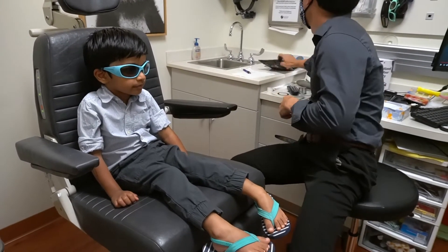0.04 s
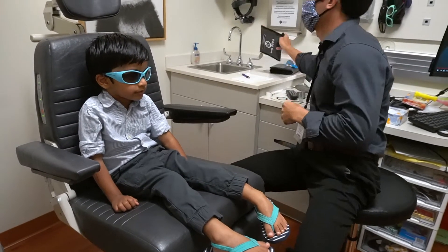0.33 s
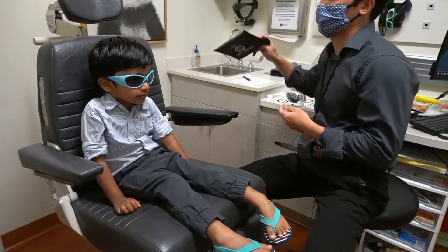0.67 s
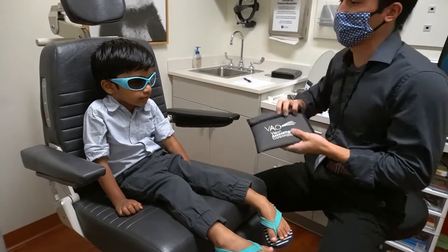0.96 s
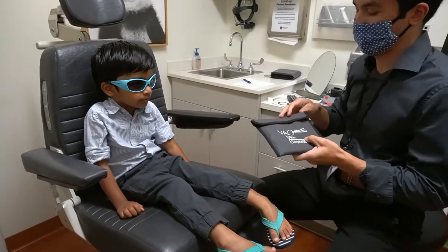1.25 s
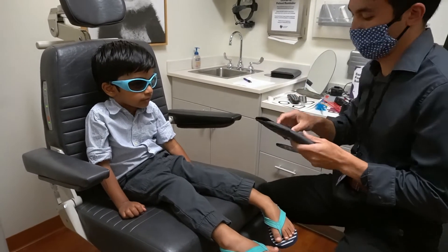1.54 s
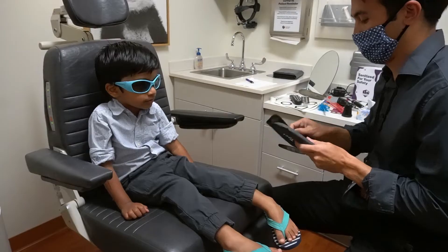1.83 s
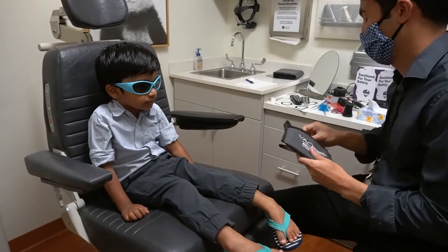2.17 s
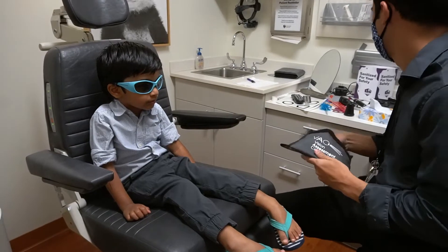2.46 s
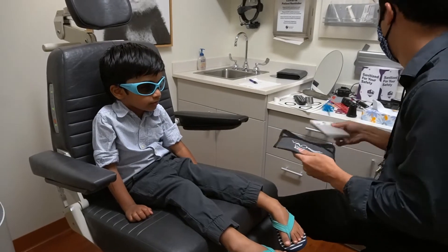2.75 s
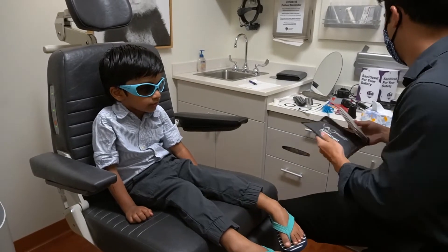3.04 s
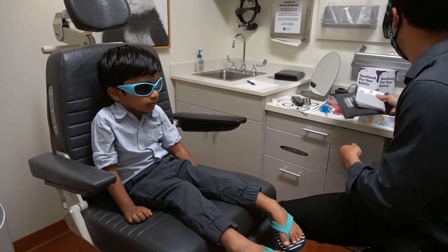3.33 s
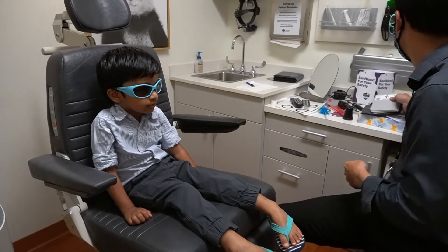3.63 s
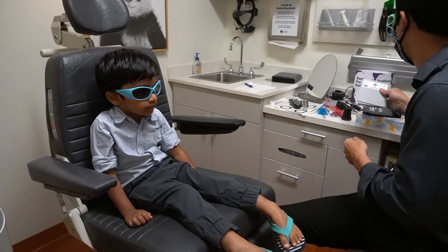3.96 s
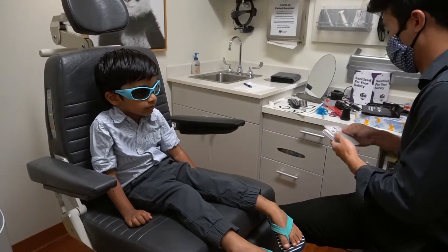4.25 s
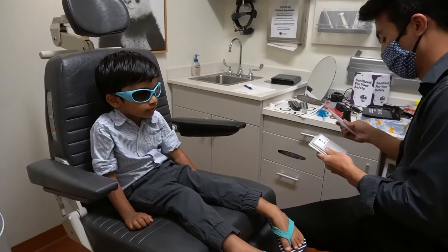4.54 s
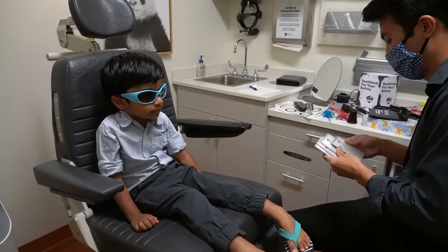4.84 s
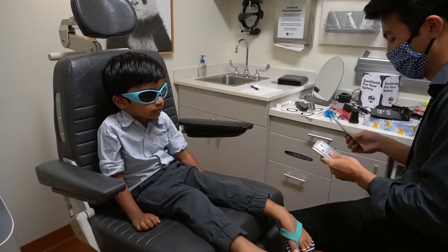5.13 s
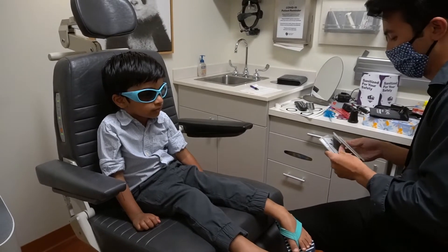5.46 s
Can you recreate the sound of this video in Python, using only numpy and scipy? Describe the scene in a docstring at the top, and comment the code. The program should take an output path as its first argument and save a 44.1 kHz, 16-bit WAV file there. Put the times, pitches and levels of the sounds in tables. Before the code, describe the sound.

A vinyl pouch is picked up and unzipped, then stiff cards slide out and click in a small humming room.

```python
"""Ventilation hums in a small room whose hard walls give a short, bright ring.
A vinyl pouch rubs and knocks as it is lifted off a countertop; the cabinet below booms.
A stool rolls while the pouch changes hands, its metal pull jingling, and is turned over.
The zipper runs, stiff cards rasp out and the pouch is laid down.
Last, the cards squeak faintly, click and snap as they are sorted."""
import sys
import numpy as np
from scipy import signal
from scipy.fft import rfft, irfft
from scipy.io import wavfile
from scipy.ndimage import uniform_filter1d

SR = 44100
rng = np.random.default_rng(int(sys.argv[2]) if len(sys.argv) > 2 else 0)


def digitize_waveform(pressure):
    """Quantize a signal to 16-bit integers and store it at the path in sys.argv[1].

    Rows of a 2-D input are taken as channels; values are limited to [-1, 1].
    """
    field = np.atleast_2d(pressure).T
    bounded = np.clip(field, -1, 1)
    quanta = np.round(bounded * 32767).astype(np.int16)
    wavfile.write(sys.argv[1], SR, quanta)


N = 246678
TIME = np.arange(N) / SR
FREQ = np.maximum(np.arange(N // 2 + 1) * SR / N, 1e-3)


def undb(db):
    """Decibels to gain."""
    return 10 ** (np.asarray(db) / 20)


def unit(x):
    """Scale to rms 1."""
    return x / np.sqrt(np.mean(x ** 2) + 1e-30)


def blow(x):
    """Scale to the energy of 2.5 ms at full level."""
    return x * np.sqrt(.0025 * SR / (np.sum(x ** 2) + 1e-30))


def add(track, start_s, x):
    """Mix a short sound into a track."""
    i = int(start_s * SR)
    track[i:i + len(x)] += x[:N - i]


def on_log(points, hz):
    """Interpolate (frequency [Hz], value) points over log frequency."""
    point_hz, value = np.transpose(points)
    return np.interp(np.log(hz), np.log(point_hz), value)


def follow(curve):
    """A curve's columns per sample, then a gate open while it lasts."""
    times_s, *columns = np.transpose(curve)
    gate = (TIME > times_s[0]) & (TIME < times_s[-1])
    return [np.interp(TIME, times_s, column) for column in columns] + [gate]


def walk(rate_hz):
    """Smooth random wavering, rms near 1."""
    hold = int(SR / rate_hz)
    steps = np.repeat(rng.standard_normal(N // hold + 1), hold)
    return unit(uniform_filter1d(uniform_filter1d(steps, hold), hold))[:N]


def uneven(spread_db, max_sigma=2):
    """Random gain per sample, clipped log-normal."""
    return undb(spread_db * np.clip(rng.standard_normal(N), -2, max_sigma))


def stroke(peak_s, length_s, rise_share=0.48, shape=1.48):
    """Swell and fade of a hand movement; shape 1 is pointed, 2 round."""
    side_s = length_s * np.where(TIME < peak_s, rise_share, 1 - rise_share)
    return np.exp(-np.minimum(np.abs((TIME - peak_s) / side_s) ** shape, 20))


def resonance(hz, width_hz):
    """Randomly driven resonance; its centre may move."""
    phase = 2 * np.pi * np.cumsum(hz * np.ones(N)) / SR
    return unit(walk(2 * width_hz) * np.cos(phase) + walk(2 * width_hz) * np.sin(phase))


def registers(colour):
    """A material's body, middle, treble and sheen spectra, each of unit power."""
    # crossovers (frequency [Hz])
    edges_hz = [700, 2500, 6500]
    below = [1 / (1 + (FREQ / edge) ** 8) for edge in edges_hz]
    shares = [below[0], (1 - below[0]) * below[1], (1 - below[1]) * below[2], 1 - below[2]]
    gain = undb(on_log(colour, FREQ)) / (1 + (130 / FREQ) ** 2)
    spectra = []
    for share in shares:
        cepstrum = irfft(np.log(unit(gain * np.sqrt(share)) + 1e-4), N)
        cepstrum[1:N // 2] *= 2  # fold to minimum phase
        cepstrum[N // 2 + 1:] = 0
        spectra.append(np.exp(rfft(cepstrum)))
    return spectra


def tilted(balance_db, db_per_octave):
    """Gains of the four registers, tilted about the middle one."""
    # per register (offset from the middle [octaves])
    offsets = [-2, 0, 2, 3]
    return undb(np.array(balance_db) + db_per_octave * np.array(offsets))


def strikes(events, modes, grit, grit_s, detune=.01):
    """Blows ring an object's modes; the contact point favours those near one centre."""
    out, t = np.zeros(N), TIME[:SR // 2]
    for start_s, db, centre_hz, spread_octaves in events:
        ring = 0
        for hz, mode_db, t60_s in modes:
            weight = undb(mode_db) * np.exp(-.5 * (np.log2(hz / centre_hz) / spread_octaves) ** 2)
            pitch_hz = hz * (1 + detune * rng.standard_normal())  # the grip shifts each mode
            decay = np.exp(-np.log(1000) * t / t60_s)
            ring = ring + rng.choice([-1, 1]) * weight * np.sin(2 * np.pi * pitch_hz * t) * decay
        force = grit * rng.standard_normal(len(t)) * np.exp(-t / grit_s)
        force[0] += 1
        add(out, start_s, undb(db) * blow(signal.fftconvolve(force, ring)))
    return out


def ventilation(air_db=-18, waver_db=3.0, drift_hz=2.71):
    """Duct rumble and hiss with wavering fan tones."""
    # duct noise (frequency [Hz], relative level [dB])
    air_colour = [(4, -5.5), (10, 1.5), (24, -2), (43, -14.5), (68, -14), (95, -31.5), (170, -31),
                  (270, -37.5), (400, -44), (700, -49), (1400, -54), (2200, -56.5), (4500, -62.5),
                  (16000, -74.5)]
    # fan tones (frequency [Hz], level [dB])
    fan_tones = [(118.4, -44.5), (242.2, -50), (888, -69)]
    air = unit(irfft(rfft(rng.standard_normal(N)) * undb(on_log(air_colour, FREQ)), N))
    fan = 0
    for hz, db in fan_tones:
        gain = undb(db + waver_db * walk(9))
        phase = 2 * np.pi * np.cumsum(hz + drift_hz * walk(14)) / SR
        fan = fan + gain * unit(np.sin(phase))
    return undb(air_db) * air + fan


def rubbing(slips_per_s=5000, slip_waver_db=1.9, crinkles_per_s=45, crinkle_db=-9):
    """Vinyl and cards catch and let go in tiny slips, with a few brighter crinkles."""
    # strokes (peak time [s], length [s], level [dB], tilt [dB/octave])
    rubs = [(0.043, 0.2, -36, 1.6), (0.223, 0.11, -28.5, -.4), (0.418, 0.14, -42.5, 0.5),
            (0.9, 0.3, -30.5, -0.3), (0.978, 0.042, -20, 2.5), (1.07, 0.12, -25, 1.5),
            (1.212, 0.082, -30, 0.1), (1.17, 0.71, -38.5, -4), (1.40, 0.091, -31, -5.5),
            (1.459, 0.063, -21, -1), (1.538, 0.11, -23.5, -4), (1.775, .13, -32, 2.5),
            (1.959, 0.056, -21, 0), (2.075, 0.15, -37.5, -0.3), (2.277, 0.19, -42.5, -.5),
            (2.427, 0.11, -35, .3), (2.635, 0.21, -35.5, -0.5), (2.705, 0.048, -23.5, 2),
            (2.768, 0.054, -30, 2), (3.144, 0.058, -35, -2.5), (3.214, .17, -40.5, -0.4),
            (3.68, 0.15, -34.5, 0.9), (3.769, 0.14, -39.5, -0.5), (4.297, 0.06, -45, -0.5),
            (4.413, 0.1, -52, 3), (4.505, .06, -48.5, 3.5), (4.89, .04, -33.5, 1.5), (5.34, 0.11, -52.5, 0)]
    # friction spectrum (frequency [Hz], relative level [dB])
    colour = [(100, 8), (350, 4), (750, -3.5), (1200, 2), (2200, -2), (4300, 0.5), (5300, -4.5),
              (7500, -7.5), (11000, -18.5), (16000, -33)]
    # body to sheen (gain [dB])
    balance_db = [-5, 0.5, -2.5, -11]
    power = np.zeros((4, N))
    for peak_s, length_s, db, tilt in rubs:
        gains = undb(db) * tilted(balance_db, tilt)
        power += gains[:, None] ** 2 * stroke(peak_s, length_s) ** 2
    slips = (rng.random(N) < slips_per_s / SR) * rng.standard_normal(N) * uneven(spread_db=0.5)
    slips = rfft(unit(slips * undb(slip_waver_db * walk(220))))
    crinkles = rfft(unit((rng.random(N) < crinkles_per_s / SR) * uneven(spread_db=3)))
    bands = zip(np.sqrt(power), tilted(crinkle_db, db_per_octave=1.26), registers(colour))
    return sum(swell * irfft((slips + crisp * crinkles) * band, N) for swell, crisp, band in bands)


def clicks(scrape=0.25, grain_db=4, clean_tick_ms=1.3):
    """Cards, vinyl and zipper make contact: a sharp tick, then dying chatter."""
    # contacts (time [s], level [dB], tilt [dB/octave], chatter decay [ms])
    contacts = [(.042, -26, 0.5, 0.96), (0.182, -25, -0.7, 2.6), (.230, -22.5, 1.2, 1.9),
                (0.388, -28, -1, 11), (.487, -41.5, 3.5, 10), (.654, -32, -1.5, 2.8), (.732, -17, 1.3, 5.5),
                (.779, -19, -1.5, 7), (.948, -9, 0, 5.5), (1.061, -15, -3, 6.2), (1.079, -32, 7.5, 11),
                (1.186, -16.5, 0, 3), (1.366, -26, -3.5, 2.4), (1.432, -16, -1.5, 7),
                (1.444, -11.5, -0.5, 9), (1.712, -29, 3, 2), (1.724, -15.5, 2.15, 5.5),
                (1.736, -17.5, 2.5, 2.3), (1.831, -24.5, 4.5, 3.3), (1.856, -16.5, 4, 5.4),
                (1.879, -10.5, 3, 5.2), (2.182, -40, 5.5, 3), (2.410, -27, 0.5, 10),
                (3.091, -27.5, -4.5, 2.7), (3.135, -28, -2.8, 2.6), (3.2336, -30.5, 2, 0.55),
                (3.383, -41.5, 0.5, 8), (3.611, -31, -4.5, 3), (4.526, -35, 0.5, 3.2), (4.851, -22, 0, 1.6),
                (4.863, -23.5, 0.9, 3), (4.933, -25.5, -2.5, 2), (4.9595, -18.5, 2.5, 0.77),
                (5.493, -24, 0.2, 0.56)]
    # contact spectrum (frequency [Hz], relative level [dB])
    colour = [(100, -13), (250, 3.5), (800, -2), (1400, 4.5), (2200, 2), (4200, -1.5), (5300, -6.5),
              (7500, -5), (11000, -15.5), (16000, -31)]
    # body to sheen (gain [dB])
    balance_db = [-7, 0.5, -1, -9]
    out, t = np.zeros(N), TIME[:4096]
    responses = [irfft(band, N)[:len(t)] for band in registers(colour)]
    for start_s, db, tilt, decay_ms in contacts:
        chatter = rng.standard_normal(len(t)) * undb(grain_db * rng.standard_normal(len(t)))
        roughness = scrape / (1 + (clean_tick_ms / decay_ms) ** 2)  # brief contacts hardly chatter
        force = roughness * chatter * np.exp(-t / (decay_ms / 1000))
        force[0] += 1
        for response, gain in zip(responses, tilted(balance_db, tilt)):
            add(out, start_s, undb(db) * gain * blow(signal.fftconvolve(force, response)))
    return out


def cabinet_boom():
    """The cabinet's low modes ring under the first knock."""
    # blow (time [s], level [dB], centre [Hz], spread [octaves])
    blows = [(.2335, -6.5, 70, 1.2)]
    # cabinet modes (frequency [Hz], relative level [dB], t60 [s])
    modes = [(48, -4, 0.25), (73, 1.5, 0.18), (121, 2, 0.15)]
    return strikes(blows, modes, grit=.01, grit_s=.005)


def knocks():
    """Dull blows ring the damped modes of countertop and pouch."""
    # knocks (time [s], level [dB], centre [Hz], spread [octaves])
    blows = [(0.2339, -3, 333, .32), (.241, -10.5, 1080, 0.59), (.263, -15, 340, 0.26),
             (1.522, -2, 1070, 0.53), (1.527, -10.5, 750, .7), (1.546, -6.5, 253, .17),
             (1.945, -23.5, 200, 1.1), (2.2099, -16.5, 523, 0.41), (2.4652, -18.5, 680, 0.68),
             (2.6017, -18.5, 610, 0.38), (3.092, -24, 1290, 0.45), (3.147, -22.5, 580, 0.34),
             (3.735, -19.5, 650, 0.74), (3.754, -20.5, 820, 0.49), (4.5255, -27.5, 420, .8),
             (5.490, -26.5, 760, 0.55)]
    # body modes (frequency [Hz], relative level [dB], t60 [s])
    modes = [(166, 6, 0.069), (247, 4, 0.082), (324, 2.5, 0.057), (371.4, 6, 0.043), (474, 1.5, 0.026),
             (542, 4, 0.021), (689, -0.5, 0.04), (720, 0.5, 0.019), (940, -0.5, 0.039), (1065, -2, 0.026),
             (1350, -15, 0.024), (1374, 2, 0.025), (1700, -6.5, 0.049), (2200, 3, 0.014), (2750, -1, .02)]
    return strikes(blows, modes, grit=0.077, grit_s=0.0029, detune=0.0056)


def stool(floor_hz=62, width_hz=36):
    """Rolling casters set the floor rumbling."""
    # roll (time [s], level [dB])
    roll = [(.9, -42), (1.05, -31), (1.18, -26.5), (1.29, -20), (1.41, -16), (1.5, -27.5), (1.6, -35),
            (1.7, -42)]
    db, rolling = follow(roll)
    return rolling * undb(db) * resonance(floor_hz, width_hz)


def pull_jingles():
    """The metal pull swings against its slider and rings."""
    # hits (time [s], level [dB], centre [Hz], spread [octaves])
    blows = [(.950, -23, 3500, 0.74), (.977, -10.5, 3750, 0.69), (.986, -18, 4200, 0.96),
             (1.079, -15.5, 5770, 0.42), (1.091, -16, 6460, 0.38), (1.115, -22, 6200, 0.83)]
    # pull modes (frequency [Hz], relative level [dB], t60 [s])
    modes = [(2886, 4.5, 0.09), (3250, -5, .04), (3800, -5, .24), (3797, 3.5, 0.15), (3930, -11, .1),
             (4440, 4, 0.03), (4500, 3, 0.047), (5550, -5, 0.21), (5620, -4, .16), (6000, 8, 0.02),
             (6310, 7, 0.038), (6680, 4, 0.028), (6800, 0, 0.043), (7100, 5, 0.036), (7120, 6, 0.035),
             (8040, 5, 0.044)]
    return strikes(blows, modes, grit=.08, grit_s=0.0039, detune=0.0012)


def zipper(jitter=.4, body_db=-11, sheen_db=-8, scrape=1.3, tooth_s=0.001):
    """The slider parts the teeth unevenly, each a tick and a scrape; the opening pouch sounds deeper."""
    # slider run (time [s], tooth rate [1/s], level [dB], treble gain [dB])
    run = [(1.82, 149, -49, 5), (1.833, 265, -19.5, 4), (1.85, 304, -28.5, 4.5), (1.88, 413, -30.5, 7),
           (1.915, 514, -17, 0.5), (1.945, 460, -20, -9), (1.965, 290, -19.5, -3.5), (1.989, 220, -45, -5)]
    # zipper spectrum (frequency [Hz], relative level [dB])
    colour = [(100, -36), (500, -6), (780, -1.5), (1300, 10), (2300, -1), (3900, 1.5), (5300, -2),
              (7500, -0.5), (11000, -9.5), (16000, -24)]
    teeth_per_s, db, treble_db, running = follow(run)
    teeth_passed = np.cumsum(teeth_per_s * np.exp(jitter * walk(300))) / SR
    ticks = np.diff(np.floor(teeth_passed), prepend=0)
    ticks *= uneven(spread_db=2.5, max_sigma=1) / np.sqrt(teeth_per_s)
    rasp = signal.lfilter([1], [1, -np.exp(-1 / (tooth_s * SR))], ticks) * rng.standard_normal(N)
    force = rfft(unit(unit(ticks) + scrape * unit(rasp)))
    bands = zip(registers(colour), (body_db, 0, treble_db, treble_db + sheen_db))
    return running * sum(undb(db + band_db) * irfft(force * band, N) for band, band_db in bands)


def card_drag(width_hz=280):
    """Sliding cards rasp in the pouch's hollow, which changes size."""
    # slide (time [s], resonance [Hz], level [dB])
    slide = [(2.12, 1240, -49), (2.31, 1228, -44.5), (2.46, 880, -36), (2.57, 850, -43), (2.62, 970, -39),
             (2.70, 1000, -31), (2.80, 900, -56)]
    hz, db, sliding = follow(slide)
    return sliding * undb(db) * resonance(hz, width_hz)


def card_squeaks(pitch_hz=1370, width_hz=130):
    """Some strokes on the cards sing faintly in one narrow band."""
    # squeaks (peak time [s], length [s], level [dB])
    squeaks = [(4.19, .07, -51), (4.31, .09, -56), (4.823, 0.055, -53), (4.891, .04, -33)]
    swell = sum(undb(db) * stroke(peak_s, length_s) for peak_s, length_s, db in squeaks)
    return swell * resonance(pitch_hz, width_hz)


def card_snaps():
    """A card edge snaps against the stack and rings briefly."""
    # snaps (time [s], level [dB], centre [Hz], spread [octaves])
    blows = [(4.851, -18, 3400, 0.44), (4.8625, -26, 3500, 0.64), (4.9597, -23, 2100, 0.53),
             (5.493, -27, 1490, 0.42)]
    # card modes (frequency [Hz], relative level [dB], t60 [s])
    modes = [(1290, -11, 0.048), (1460, -9, 0.03), (1720, -2.5, 0.03), (1970, -2, 0.013),
             (2530, 7.5, 0.0071), (3220, -11, .01), (3560, 6, 0.0096), (4220, 5.5, 0.0094)]
    return strikes(blows, modes, grit=0.052, grit_s=0.0012, detune=.005)


def room(x, wet_db):
    """Direct sound plus a dense tail from close walls, shortest in the top band."""
    # room decay (frequency [Hz], t60 [s])
    decay_times = [(120, 0.4), (300, 0.39), (1000, 0.36), (3000, 0.32), (6000, 0.48), (10000, 0.35),
                   (16000, 0.22)]
    t = TIME[:int(.7 * SR)]
    hz = np.maximum(np.fft.rfftfreq(len(t), 1 / SR), 1)
    centres_hz = np.geomspace(120, 16000, num=8)
    echoes = rng.standard_normal(len(t))
    early_db = 3.7 * np.exp(-t / 0.0094) * (rng.standard_normal(len(t)) + 1)  # first echoes stand out
    spectrum = rfft(echoes * undb(early_db))
    tail = 0
    for centre_hz, pick in zip(centres_hz, np.eye(len(centres_hz))):
        band = irfft(spectrum * np.interp(np.log(hz), np.log(centres_hz), pick), len(t))
        tail = tail + band * np.exp(-np.log(1000) * t / on_log(decay_times, centre_hz))
    tail *= np.clip((t - .002) / 0.0021, 0, 1)
    return x + undb(wet_db) * signal.fftconvolve(x, tail / np.linalg.norm(tail))[:N]


def scene():
    """Handling sounds in the room, over rumble and ventilation; mono."""
    contacts = room(clicks() + card_snaps(), wet_db=-0.5)
    thuds = room(knocks(), wet_db=-4)
    pull = room(pull_jingles(), wet_db=0)
    friction = room(rubbing() + card_drag() + card_squeaks(), wet_db=-3)
    unzipping = room(zipper(), wet_db=2)
    rumble = stool() + cabinet_boom()
    return (contacts + thuds + pull + friction + unzipping + rumble + ventilation())[None]


def record(dry):
    """Soft-clip the peaks, then low-pass."""
    ceiling, top_hz = .95, 16100
    rounded = dry / (1 + (dry / ceiling) ** 6) ** (1 / 6)
    return signal.sosfilt(signal.ellip(10, .2, 80, top_hz, fs=SR, output="sos"), rounded)


dry = scene()
out = record(dry)
digitize_waveform(out)
```